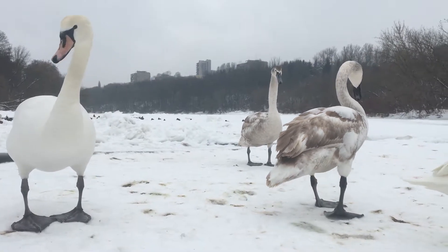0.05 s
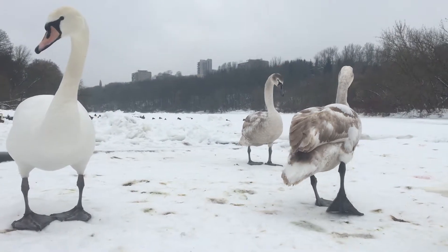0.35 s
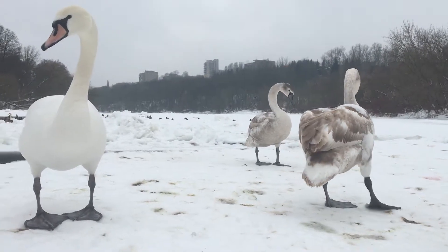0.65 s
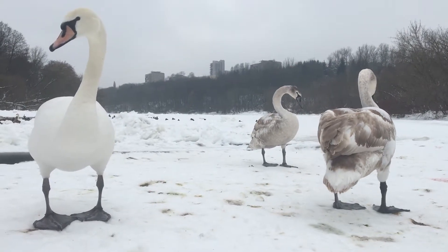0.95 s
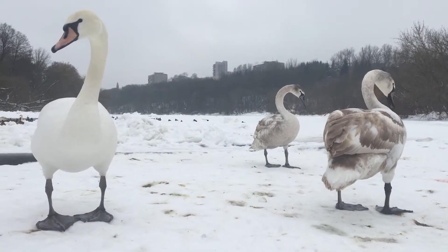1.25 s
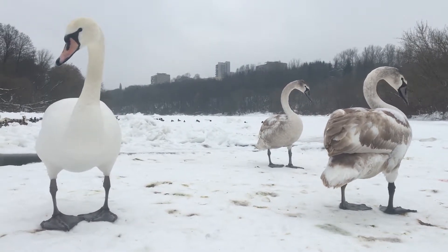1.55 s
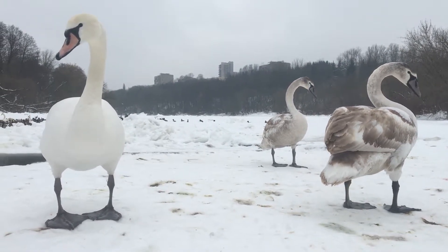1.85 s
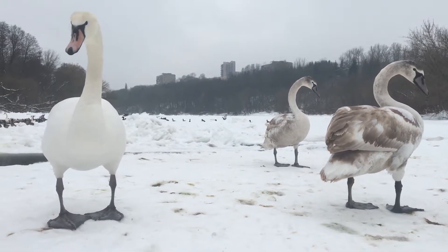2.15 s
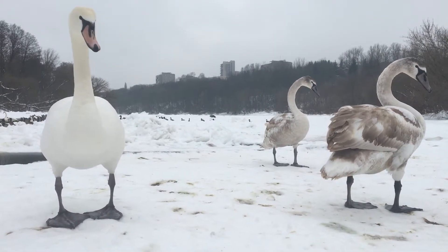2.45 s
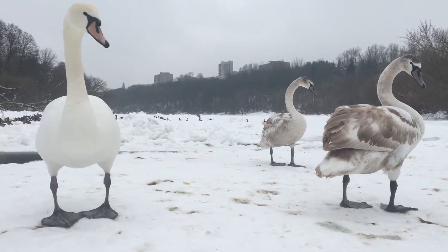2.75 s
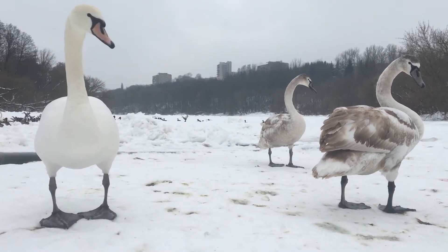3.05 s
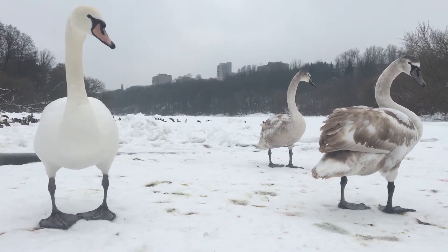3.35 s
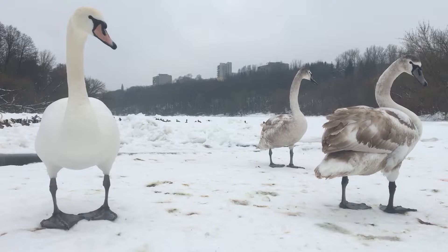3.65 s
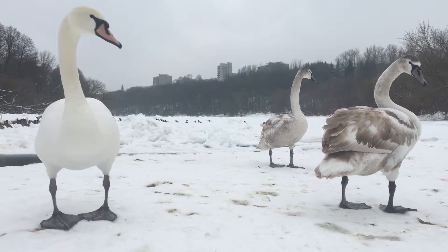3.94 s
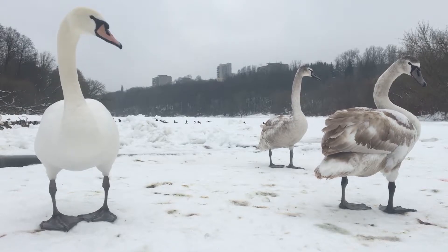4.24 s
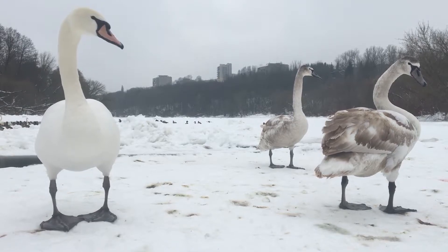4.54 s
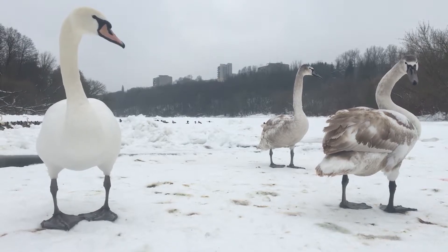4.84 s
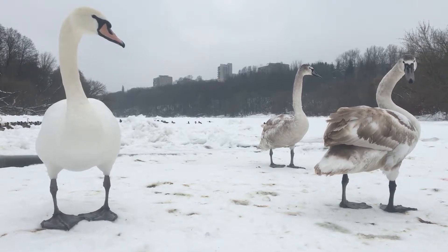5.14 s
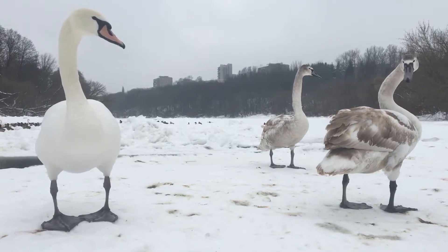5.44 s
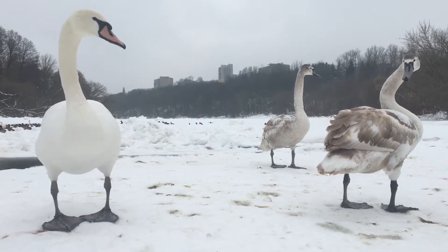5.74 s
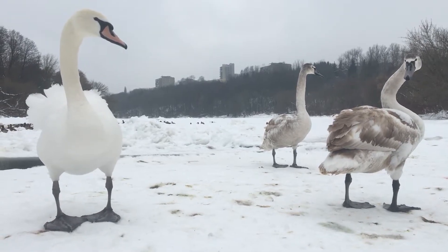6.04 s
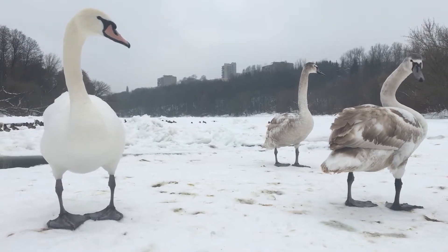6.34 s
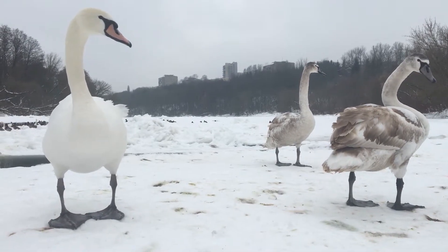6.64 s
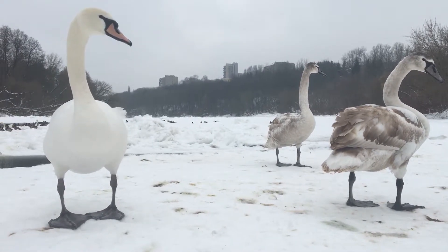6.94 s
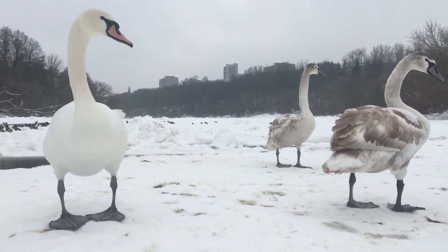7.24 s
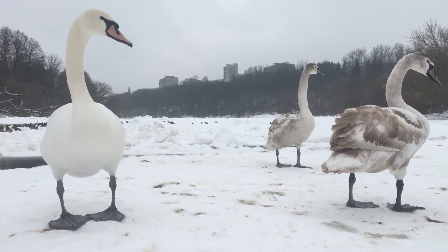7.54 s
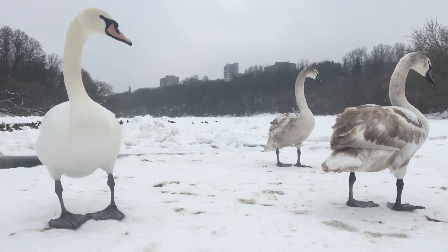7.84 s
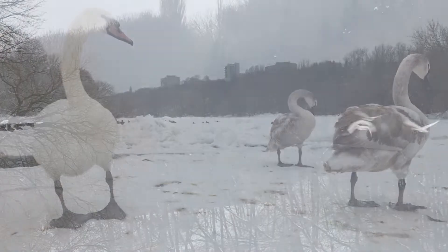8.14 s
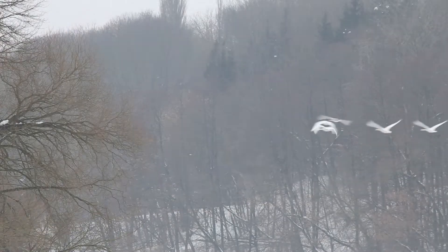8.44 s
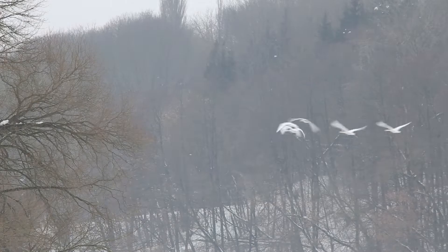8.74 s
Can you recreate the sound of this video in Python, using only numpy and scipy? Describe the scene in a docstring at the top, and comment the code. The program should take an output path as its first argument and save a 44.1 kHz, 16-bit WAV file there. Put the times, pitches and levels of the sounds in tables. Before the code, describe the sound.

A swan gives two short, low rattling snorts, then light wind thumps against the microphone over a faint outdoor hiss.

```python
"""Swans stand on a snowy riverbank. Over a distant hum and a soft hiss, eddies of light wind buffet the
microphone; webbed feet and feathers rustle, a small bird whistles far off, and faint rasps come and go.
Near 2 s one swan gives two short snorts, each a rattle of six or seven flaps of its airway. Later the
buffets grow stronger, a few icy ticks sound, and two far, reedy tones swell. Near the end the wind stops
abruptly; only the background, a few faint, raspy calls and the last ticks stay."""
import sys
import numpy as np
from scipy import signal
from scipy.fft import rfft, irfft, next_fast_len
from scipy.io import wavfile

SR = 44100
rng = np.random.default_rng(int(sys.argv[2]) if len(sys.argv) > 2 else 0)


def log_audio(samples):
    """Write samples as a 16-bit WAV file to the path given in sys.argv[1]."""
    # one column per channel
    frames = np.atleast_2d(samples).T
    # limit to full scale, then quantise
    limited = np.clip(frames, -1, 1)
    pcm = np.round(limited * 32767).astype(np.int16)
    wavfile.write(sys.argv[1], SR, pcm)


N = 392049
TIME = np.arange(N) / SR
WIND_STOP_S = 8.358


def from_db(db):
    """Amplitude ratio of a level in decibels."""
    return 10 ** (np.asarray(db) / 20)


def rms_one(x):
    """Normalisation to rms 1."""
    return x / np.sqrt(np.mean(x ** 2) + 1e-20)


def in_time(rows):
    """Linear interpolation of (t/s, value) rows at every sample."""
    return np.interp(TIME, *np.transpose(rows))


def coloured(x, points):
    """Spectral shaping by an outline of (f/Hz, level/dB), falling 21 dB an octave beyond its ends."""
    hz, db = np.transpose(points)
    size = next_fast_len(N)
    octave = np.log2(np.maximum(np.arange(size // 2 + 1) * SR / size, 1))
    beyond = np.abs(octave - np.clip(octave, np.log2(hz[0]), np.log2(hz[-1])))
    gain = from_db(np.interp(octave, np.log2(hz), db) - 21 * beyond)
    return irfft(rfft(x, size) * gain, size)[:N]


def noise(points):
    """Filtered Gaussian noise of rms 1."""
    return rms_one(coloured(rng.standard_normal(N), points))


def drift(hz):
    """Random modulation: noise of rms 1, low-passed at `hz`."""
    step = 40
    pole = np.exp(-2 * np.pi * hz * step / SR)
    slow = signal.lfilter([1], [1, -2 * pole, pole * pole], rng.standard_normal(N // step + 2002))[2000:]
    return np.interp(np.arange(N) / step, np.arange(len(slow)), rms_one(slow))


def add(out, start_s, sound):
    """Superposition of a short sound at a given time."""
    i = max(int(round(start_s * SR)), 0)
    out[i:i + len(sound)] += sound[:max(N - i, 0)]


def by_chance(per_s, end_s, count=120):
    """A jittered event train: rows of t/s and two standard normal values."""
    times = (np.arange(count) + rng.random(count)) / per_s
    return np.column_stack([times, rng.standard_normal((count, 2))])[times < end_s]


def breeze_on():
    """A gate: 1 while the wind blows, 0 after its abrupt stop."""
    return np.clip((WIND_STOP_S - TIME) / 0.0024, 0, 1)


def background(hum_drop_db=1, hiss_drop_db=4, top_drop_db=7):
    """Broadband noise: a far hum, a wavering hiss and an airy top, all stepping down as the wind stops."""
    # spectra of the three bands (f/Hz, level/dB)
    hum_spectrum = [(90, -3), (140, -17), (250, -17.5), (350, -2), (450, -4.5), (700, -0.5), (1000, 0.5),
                    (1300, -4.5), (1800, -12), (3000, -28)]
    hiss_spectrum = [(900, -12), (1300, -6), (1700, -0.5), (2100, -0.5), (2600, -5.5), (3400, -10.5),
                     (4200, -16), (5000, -22.5), (7000, -26)]
    top_spectrum = [(2500, -8), (4000, 4.5), (4900, 0), (5600, 3), (7400, -3.5), (9700, -2.5), (10400, -10),
                    (11200, -4.5), (15500, -10)]
    # slow envelopes of the upper two (t/s, relative level/dB)
    hiss_level = [(0.0, -70), (0.42, -68.5), (1.41, -70.5), (2.8, -62), (2.93, -61), (5.55, -61.5),
                  (6.26, -64), (6.73, -63.5), (7.37, -65.5), (8.16, -60), (8.3, -60.5)]
    top_level = [(0.0, -78), (0.67, -78.5), (1.31, -78.5), (1.69, -74.5), (3.23, -73), (3.65, -69.5),
                 (4.23, -68.5), (4.62, -74), (4.85, -71.5), (4.99, -70.5), (6.1, -77.5), (7.54, -77),
                 (8.18, -72.5), (8.3, -74.5)]
    calm = 1 - breeze_on()
    hum = from_db(-65 - hum_drop_db * calm) * noise(hum_spectrum)
    waver_db = 0.25 * drift(11) + 0.95 * drift(10.6) + drift(130)
    hiss = from_db(in_time(hiss_level) + 1 - hiss_drop_db * calm + waver_db) * noise(hiss_spectrum)
    top = from_db(in_time(top_level) + 1 - top_drop_db * calm + .5 * drift(27)) * noise(top_spectrum)
    return hum + hiss + top


def swirl(t, hz, cycles=0.68, slowing=0.28, late=0.11):
    """Pressure of a passing eddy: a swing or two, quick at first, slower and fuller behind."""
    turns = hz * t * (1 - slowing * np.tanh(hz * t))
    return -np.exp(-((turns - late) / cycles) ** 2) * np.cos(2 * np.pi * turns)


def wind(wake_db=-21, wake_s=0.017, gust_db=-29, gust_s=0.083):
    """Turbulent pressure at the microphone: a lumpy rumble with single eddies on top."""
    # strength of the breeze (t/s, relative level/dB)
    breeze = [(0.0, -55.5), (1.39, -58), (2.44, -52.5), (3.13, -57.5), (3.59, -51), (4.5, -58),
              (4.93, -55.5), (6.17, -57), (6.65, -53.5), (7.45, -56), (7.61, -61), (7.76, -56),
              (8.03, -53.5), (8.25, -55)]
    # strong eddies (t/s, level/dB, f/Hz, forerunner re eddy/dB)
    buffets = [(.81, -46, 69, -8), (1.501, -45.5, 91, -10), (2.089, -39, 95, -17),
               (2.189, -40.5, 81.5, -15), (2.525, -41.5, 65, -14), (2.596, -41, 60, -4),
               (2.817, -39.5, 113.5, -2), (2.962, -43, 67.6, -19), (4.223, -38.5, 85, -16),
               (4.263, -30, 99, -25), (4.61, -47, 70, -15), (4.778, -39.5, 75, -17), (4.849, -40.5, 90, -2),
               (4.893, -30, 112, -20), (4.92, -35, 69.4, -22), (4.962, -30, 92, -14), (5.067, -39, 172, -8),
               (5.08, -30.5, 82, -20), (5.131, -34, 190, -25), (5.464, -31, 72, -20),
               (5.492, -25.5, 83.5, -27), (5.5059, -22, 137, -19), (5.527, -32, 77, -25),
               (5.7259, -24, 159, -42), (5.835, -40, 156, -26), (5.935, -32.5, 150, -33),
               (6.688, -37, 100, -4), (6.727, -33.5, 89, -22), (6.741, -24, 158, -20),
               (6.752, -29.5, 83, -22), (6.994, -38.5, 130, -10), (7.0195, -24.5, 135, -20),
               (7.032, -32, 91, -20), (7.066, -33.5, 126, -26), (7.132, -39, 70, -10),
               (7.37, -39, 52.4, -8.5), (7.49, -40.5, 57.4, -9), (7.862, -36, 76, -24),
               (7.867, -35, 286, -2), (7.876, -25, 95.5, -27), (8.051, -39.5, 65.4, -12),
               (8.286, -36.5, 125, -23), (8.297, -37.5, 75, -25), (8.327, -32, 112, -24),
               (8.352, -35, 134, -20)]
    # spectra of the rumble and of the turbulence around each strong eddy (f/Hz, level/dB)
    rumble_spectrum = [(25, -16), (42, 2), (58, 2.5), (86, -4), (136, -8.5), (240, -16.5), (340, -21.5),
                       (420, -36.5), (520, -50)]
    wake_spectrum = [(35, 7), (60, 8.5), (120, -8), (200, -11.5), (330, -10.5), (460, -35)]
    breeze_db = in_time(breeze)
    eddies, wake_power, gust_power = np.zeros((3, N))
    t = np.arange(-.3, .3, 1 / SR)
    for at, db, hz, forerunner_db in buffets:
        # a broad swirl around a small, fast core; a slower swirl arrives 3.5 cycles ahead
        main = swirl(t, 0.98 * hz) + 0.19 * swirl(t, 1.95 * hz)
        forerunner = from_db(forerunner_db) * swirl(t + 3.5 / hz, 0.76 * hz)
        add(eddies, at + t[0], from_db(db) * (main + forerunner))
        add(wake_power, at + t[0], from_db(db + wake_db) ** 2 * np.exp(-(t / wake_s) ** 2))
        add(gust_power, at + t[0], from_db(db + gust_db) ** 2 * np.exp(-(t / gust_s) ** 2))
    lumpy = rms_one(noise(rumble_spectrum) * from_db(2.5 * drift(9.1)))
    rumble = np.sqrt(from_db(breeze_db + 2.5) ** 2 + gust_power) * lumpy
    # weak eddies come at random, sized by the breeze
    for at, weakness, pitch in by_chance(per_s=5, end_s=WIND_STOP_S):
        db = np.interp(at, TIME, breeze_db) + 7 - weakness
        add(eddies, at + t[0], from_db(db) * swirl(t, hz=109 * 2 ** (0.42 * pitch)))
    return (rumble + eddies + np.sqrt(wake_power) * noise(wake_spectrum)) * breeze_on()


def crackle(snaps_per_s=820, snap_share=0.22):
    """Shot noise of single snapping grains within a smooth crush; their powers sum to 1."""
    # treble spectrum of the crunch (f/Hz, level/dB)
    spectrum = [(2500, -7), (4000, -5), (6000, 2.5), (9000, 0.5), (10400, -1.5), (12000, 2.5),
                (15500, -1.5)]
    impulses = (rng.random(N) < snaps_per_s / SR) * rng.standard_normal(N)
    snaps = rms_one(coloured(impulses, spectrum))
    return np.sqrt(1 - snap_share) * noise(spectrum) + np.sqrt(snap_share) * snaps


def rustles(gain_db=-8, grain_db=3.5, attack_share=0.025, lead_s=0.00094):
    """Each touch of foot or feather starts a shower of crackles that decays exponentially."""
    # clear touches on snow and feathers (t/s, relative level/dB, body re treble/dB, T60/s)
    touches = [(.042, -62, 8, 0.2), (0.08, -52.5, 5, 0.093), (.102, -63, 5, .08), (0.17, -56, -2, 0.062),
               (.191, -57, 8, .03), (0.245, -53.5, 6.5, 0.032), (0.294, -46, 0.5, 0.12),
               (0.345, -57.5, 0, 0.15), (.412, -54, -6, 0.056), (.436, -61, -1, .05),
               (.562, -68, 14.5, 0.07), (.642, -64, -9, 0.14), (0.679, -59.5, 12, 0.11),
               (.732, -51, -1, 0.072), (.797, -57.5, 4.5, 0.13), (0.826, -52.5, -4, 0.22),
               (1.043, -52, 3, 0.06), (1.056, -55, 2, 0.11), (1.088, -55.5, 0, 0.16),
               (1.536, -47.5, -2, 0.045), (1.601, -58.5, 4, 0.15), (1.684, -53, -3, 0.14),
               (1.842, -47.5, -5, 0.14), (2.043, -50.5, -4, 0.094), (2.686, -50, -8, .035),
               (2.715, -55, 1, 0.33), (2.921, -57, -8, .06), (3.42, -51, -12, 0.16), (3.488, -58, -12, .14),
               (3.529, -51, -12, 0.027), (3.627, -48.5, -15, 0.18), (3.681, -55, -12, 0.11),
               (3.714, -53, -12, 0.036), (3.827, -40, -11, 0.041), (7.676, -57, 8, 0.03),
               (8.327, -55.5, -10, .09)]
    # spectrum of the body of the crunch (f/Hz, level/dB)
    body_spectrum = [(500, -18), (1200, -4), (2500, -4), (4000, -7), (6000, -12.5)]
    # while the young swan walks, lighter touches fall at random
    light_touches = [(at, -67.5 + 4 * strength, 1, 0.21 * 2 ** (length / 2))
                     for at, strength, length in by_chance(per_s=11, end_s=1.6)]
    treble, body = np.zeros((2, N))
    t = np.arange(SR // 2) / SR
    for at, db, body_db, t60 in list(touches) + light_touches:
        attack = 1 - np.exp(-t / (attack_share * t60))  # a longer press builds up more slowly
        shower = from_db(db - 60 * t / t60) * attack
        add(treble, at - lead_s, shower)
        add(body, at - lead_s, shower * from_db(body_db))
    treble *= crackle() * rms_one(from_db(grain_db * drift(260)))
    body *= noise(body_spectrum) * rms_one(from_db(grain_db * drift(240)))
    return from_db(gain_db) * (treble + body)


def bird(scoop_hz=110, scoop_s=0.0132, gain_db=3):
    """Frequency glide: each thin whistle is a pure tone that slides up on to its note."""
    # far whistles (t/s, duration/s, f/Hz, relative level/dB)
    whistles = [(.075, .06, 2270, -70), (.955, 0.045, 2580, -70), (1.339, 0.043, 4130, -75),
                (2.745, 0.1, 4200, -67.5), (3.2, 0.11, 4205, -69.5), (3.222, 0.04, 3940, -66),
                (3.345, 0.035, 3890, -73), (3.57, .065, 4100, -71), (3.685, 0.12, 4215, -70.5),
                (4.2, 0.12, 4210, -72), (4.66, 0.1, 4205, -71.5), (5.16, 0.1, 4180, -71.5)]
    out = np.zeros(N)
    for at, length, hz, db in whistles:
        t = np.arange(int(length * SR)) / SR
        phase = 2 * np.pi * np.cumsum(hz - scoop_hz * np.exp(-t / scoop_s)) / SR
        swell = np.sqrt(np.abs(np.sin(np.pi * t / length)))
        add(out, at, from_db(db + gain_db) * swell * np.sin(phase))
    return out * from_db(1.2 * drift(30))


def resonant_noise(hz, width, count):
    """White noise through one resonance, its edges a factor 1 + width either side of `hz`."""
    band = signal.butter(2, [hz / (1 + width), hz * (1 + width)], "band", fs=SR, output="sos")
    return rms_one(signal.sosfilt(band, rng.standard_normal(count)))


def rasps(width=0.17, grain_db=3.5):
    """Faint raspy swells: noise in one broad resonance, roughened by fast amplitude modulation."""
    # scuffs, a feather brush and a few late calls (middle t/s, duration/s, centre f/Hz, level/dB)
    swells = [(0.568, 0.044, 2620, -67), (3.499, 0.41, 1950, -61.5), (4.1, 0.18, 8300, -68.5),
              (4.601, 0.38, 1860, -62), (5.52, 0.27, 2100, -62.5), (6.5, 0.32, 2150, -66.5),
              (6.879, 0.13, 1880, -59.5), (7.489, 0.056, 2000, -60.5), (7.829, .3, 2000, -69),
              (8.039, 0.11, 1820, -57), (8.151, 0.14, 1970, -59), (8.41, .05, 2180, -59),
              (8.511, .04, 2350, -59), (8.635, 0.13, 2550, -58.5), (8.71, 0.11, 2150, -60)]
    out = np.zeros(N)
    for at, length, hz, db in swells:
        count = int(length * SR)
        swell = np.sin(np.linspace(0, np.pi, count))
        add(out, at - length / 2, from_db(db) * swell * resonant_noise(hz, width, count))
    return out * rms_one(from_db(grain_db * drift(120)))


def puff(t, hz):
    """A smooth compression of height 1 between two rarefactions."""
    u = (np.pi * hz * t) ** 2
    return (1 - 2 * u) * np.exp(-u)


def airway_flaps(closed_hz=950, clap_s=0.0004, stiff_s=0.02, tired_s=0.0835, tiring_s=0.0135):
    """A valve driven by breath: each flap claps open, and its ring rises and sinks with the opening."""
    # snorts (t/s, duration/s, flap rate/Hz, level/dB, widest ring f/Hz, overtone/dB, stiffness 0-1)
    breaths = [(1.8975, 0.112, 61.2, -24, 3170, -15, 0.42), (2.2543, 0.095, 59.0, -24, 3600, -27, 0)]
    # the push behind a snort (t/s from its start, level/dB, opening 0-1, ring re clap/dB)
    push = [(0, -8, .62, -4), (.017, -1, .77, -5), (.045, 0, .98, -10), (0.067, -1, 1, -6.5),
            (.086, -5, .92, -4.5), (.107, -11, 0.33, -16)]
    # ring during one flap (t/s from the clap, share of its rise in pitch 0-1, level/dB)
    flap = [(-.003, 0.13, -25), (-.0012, 0.04, 0.5), (0, 0.12, -0.5), (.0009, 0.61, 1.5), (.0017, 0.91, -3),
            (.0032, .99, -2), (.0049, 0.64, -8), (.0085, 0.29, -26)]
    rings, claps, opening, throb = np.zeros((4, N))
    t = np.arange(-.004, .02, 1 / SR)
    knots = np.linspace(t[0], t[-1], 40)
    flap_s, rise_share, shape_db = np.transpose(flap)
    rise = np.interp(t, flap_s, rise_share)
    ring_shape = from_db(np.interp(t, flap_s, shape_db, left=-np.inf, right=-np.inf))
    push_s, *push_curves = np.transpose(push)
    for start, length, rate, db, widest_hz, overtone_db, stiffness in breaths:
        age = 0
        while age < length:
            push_db, width, ring_db = (np.interp(age, push_s, curve) for curve in push_curves)
            free = 1 - stiffness * np.exp(-age / stiff_s)  # a stiff start wears off
            at = start + age
            gain = np.sqrt(free) * from_db(db + push_db)
            # pitch and strength of the ring flutter at random
            bend, flutter = (np.interp(t, knots, row) for row in rng.standard_normal((2, len(knots))))
            hz = (closed_hz + (free * width * widest_hz - closed_hz) * rise) * (1 + 0.066 * bend)
            phase = 2 * np.pi * (np.cumsum(hz) - hz[t < 0].sum()) / SR  # every clap starts alike
            octave = from_db(overtone_db) * np.sin(2 * phase)
            third = from_db(overtone_db - 3) * np.sin(3 * phase)  # the rasp of a hard clap
            clap = np.exp(-.5 * (t / clap_s) ** 2) * (np.sin(phase) + third)
            ring = from_db(ring_db + 4 * flutter) * ring_shape * (np.sin(phase) + octave)
            add(rings, at + t[0], gain * (clap + ring))
            add(claps, at, [gain])
            add(opening, at + t[0], gain * ring_shape * (t > 0))
            # the air let through swells the neck as a soft low throb
            add(throb, at + t[0], gain * puff(t - 0.0083, hz=125))
            # the flaps slow down as the push runs out
            age += (1 + np.exp((age - tired_s) / tiring_s - 1)) / rate
    return rings, claps, opening, throb


def snorts(pipe_hz=236, pipe_t60=0.078, scatter_t60=0.24, spit_db=-26, scatter_db=-24, throb_db=-14):
    """Source and filter: the flaps excite damped modes of throat and windpipe, and air spits through."""
    # throat modes (f/Hz, level re clap/dB, T60/s)
    throat_modes = [(1000, -24, 0.022), (1840, -18, 0.018), (3130, -20, 0.028)]
    # response of the airway and spectrum of the spitting air (f/Hz, level/dB)
    airway_response = [(300, -9), (500, -11.5), (660, -11), (890, -4), (1350, -4.5), (1900, -0.5),
                       (2350, -6), (2800, -4.5), (3200, 2), (3650, -2), (4200, -8.5), (5600, -5.5),
                       (6700, -19), (9000, -12)]
    spit_spectrum = [(500, -1), (1000, -2), (3400, -5), (4300, -14), (5500, -14), (6600, -15), (8500, -14),
                     (15000, -34)]
    rings, claps, opening, throb = airway_flaps()
    t = np.arange(SR // 10) / SR
    throat = sum(from_db(db - 60 * t / t60) * np.sin(2 * np.pi * hz * t) for hz, db, t60 in throat_modes)
    voice = coloured(rings + signal.oaconvolve(claps, throat)[:N], airway_response)
    voice += from_db(spit_db) * opening * noise(spit_spectrum)
    # the long windpipe hums on from flap to flap
    pipe_envelope = from_db(-25 - 60 * t / pipe_t60) * (1 - np.exp(-2 * pipe_hz * t))
    windpipe = signal.oaconvolve(claps, pipe_envelope * np.cos(2 * np.pi * pipe_hz * t))[:N]
    # snow and bodies scatter a faint, very short tail
    tail = rng.standard_normal(len(t)) * from_db(-60 * t / scatter_t60)
    scatter = signal.oaconvolve(voice, tail / np.linalg.norm(tail))[:N]
    return voice + from_db(scatter_db) * scatter + from_db(throb_db) * throb + windpipe


def ticks(width=0.11, t60=0.0092, gain_db=-5):
    """Tiny icy ticks: each a quickly damped burst of noise in one high resonance."""
    # bursts (t/s, centre f/Hz, relative level/dB)
    bursts = [(5.842, 9200, -51), (5.968, 8500, -53), (6.686, 12000, -60), (8.639, 7000, -57),
              (8.74, 6600, -55), (8.779, 6300, -61)]
    out = np.zeros(N)
    t = np.arange(SR // 20) / SR
    for at, hz, db in bursts:
        add(out, at, from_db(db + gain_db - 60 * t / t60) * resonant_noise(hz, width, len(t)))
    return out


def far_tones(waver=0.00494):
    """Harmonics of a slightly wavering pulse train, heard through a narrow band, make a reedy tone."""
    # faint tones (middle t/s, duration/s, fundamental f/Hz, level/dB)
    tones = [(7.73, 0.28, 237.3, -66), (8.1, 0.3, 232.5, -63.5)]
    # their pass band (f/Hz, level/dB)
    band = [(1400, -2), (1900, 3), (2150, 2), (2450, -12), (2800, -12), (3100, -16)]
    out = np.zeros(N)
    for at, length, hz, db in tones:
        cycles = np.cumsum(hz * (1 + waver * drift(8.1))) / SR
        pulses = np.diff(np.floor(cycles), prepend=0)
        swell = np.sqrt(np.clip(1 - (2 * (TIME - at) / length) ** 2, 0, 1))
        out += from_db(db) * swell * rms_one(coloured(pulses, band))
    return out


def scene():
    """Superposition of all sources at one microphone."""
    return (background() + wind() + rustles() + bird() + rasps() + snorts() + ticks() + far_tones())[None]


def record(dry, cutoff_hz=15800):
    """Band limiting: an elliptic low-pass cuts the top steeply."""
    return signal.sosfilt(signal.ellip(12, .1, 80, cutoff_hz, fs=SR, output="sos"), dry)


dry = scene()
out = record(dry)
log_audio(out)
```